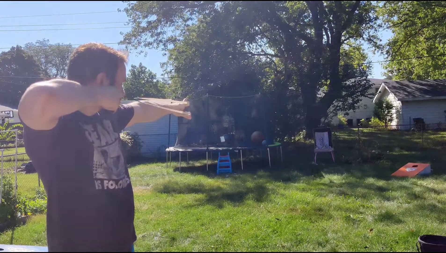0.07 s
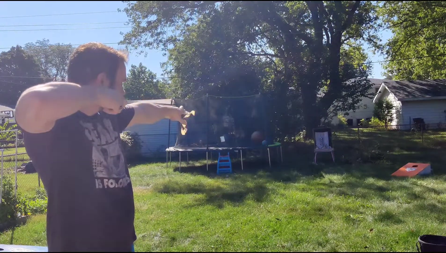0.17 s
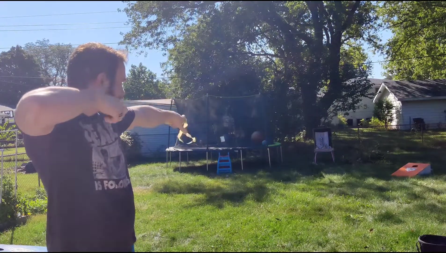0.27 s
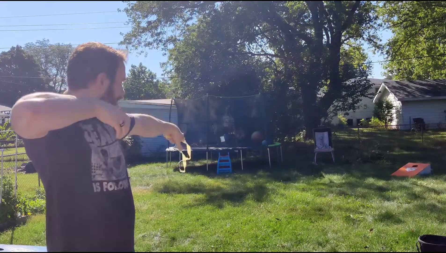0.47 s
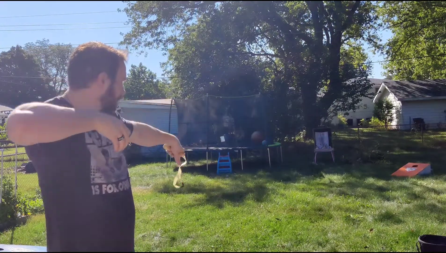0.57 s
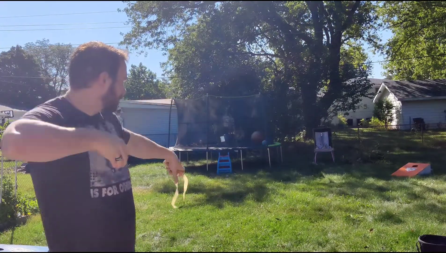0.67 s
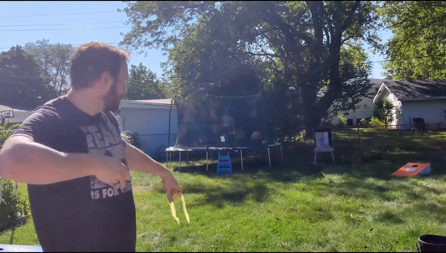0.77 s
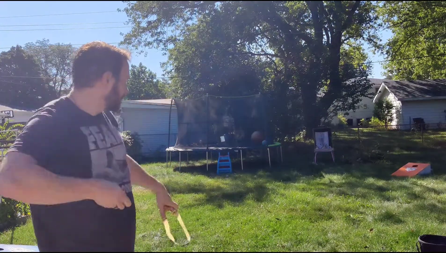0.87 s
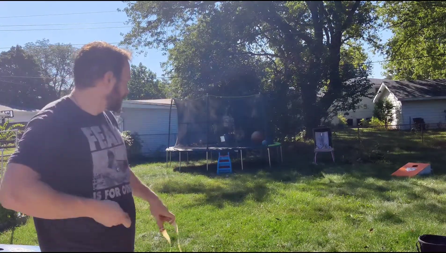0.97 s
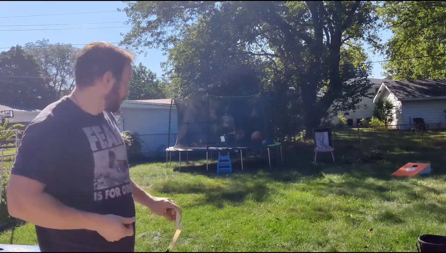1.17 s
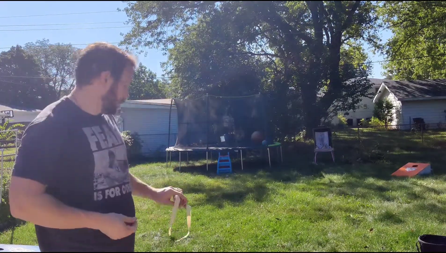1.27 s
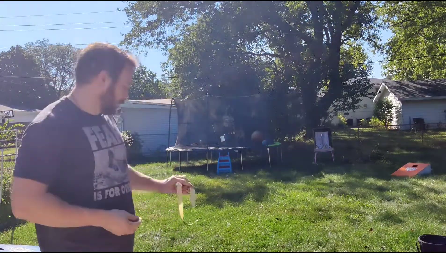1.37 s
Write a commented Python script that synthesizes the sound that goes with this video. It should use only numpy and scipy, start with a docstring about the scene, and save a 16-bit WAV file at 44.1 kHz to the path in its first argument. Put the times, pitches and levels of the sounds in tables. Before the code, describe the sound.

A slingshot band snaps twice in quick succession at about 0.2 seconds, close by, pushing soft puffs of air at the microphone. Just before 0.5 seconds the ball hits a thin metal can with a loud, briefly ringing smack and a low boom. Echoes scatter around the yard and fade by about 1 second, leaving a faint cricket, one faint falling bird note and distant rumble.

```python
"""A faint cricket chirps over distant rumble and hiss. At 0.2 s a slingshot band snaps twice close to a
two-port microphone and pushes puffs of air at it. At 0.46 s the steel ball smacks a thin metal can across
the yard: the can rings and something slack behind it booms. Walls throw the smack back, fences and trees
scatter it. From 1 s, as the tail fades, the cricket returns and a bird adds one falling note."""
import sys
import numpy as np
from scipy import signal
from scipy.fft import rfft, irfft, next_fast_len
from scipy.io import wavfile
from scipy.ndimage import uniform_filter1d

SR = 44100
rng = np.random.default_rng(int(sys.argv[2]) if len(sys.argv) > 2 else 0)


def inscribe(sig):
    """Save sig as 16-bit PCM at rate SR to the path in sys.argv[1].

    A 1-D sig is mono; a 2-D sig holds one channel per row.
    Samples are clipped to [-1, 1] before scaling.
    """
    pcm = np.round(np.clip(np.atleast_2d(sig).T, -1, 1) * 32767)
    wavfile.write(sys.argv[1], SR, pcm.astype(np.int16))


N = 61739
SIDE = np.array([[.5], [-.5]])  # splits a left-right balance in dB between the channels


def can():
    """The ball smacks the can: a crack and a metal ring, then wall echoes and the yard's scatter."""
    # the smack, then its wall echoes: t/s, level/dB, dull above f/Hz, decay stretch/ratio
    hits = [(.4594, -5.5, 8330, 1.24), (.478, -22, 2975, 2), (.501, -10.5, 1100, 0.55),
            (.5307, -26.5, 1064, 1.2), (.5761, -23.5, 1480, 1.5), (.638, -13, 790, 4.26),
            (.667, -24.5, 1300, 2.26), (.699, -27.5, 1390, 4.5), (.722, -31, 2700, 1.73),
            (.7951, -45, 1410, 4.4), (.9129, -42, 1040, 1.8), (.9335, -40.5, 950, 2.7),
            (.955, -39, 1050, 1.6)]
    smack, echoes, t = np.zeros(N), np.zeros(N), np.arange(SR // 10) / SR
    impact_s, *impact = hits[0]
    add(smack, impact_s, can_ring(*impact, rise_s=.0003))
    crack_band = signal.butter(4, [900, 7000], "bandpass", fs=SR, output="sos")
    crack = signal.sosfilt(crack_band, rng.standard_normal(len(t)))
    add(smack, impact_s, crack * decay(t, db=-24, t60=0.051))
    for start, db, dull_hz, stretch in hits[1:]:
        add(echoes, start, can_ring(db, dull_hz, stretch, rise_s=1.5 / dull_hz))
    heard = smack + echoes + amp(-4.5) * yard(smack)
    low_cut = signal.butter(4, 634, "highpass", fs=SR, output="sos")  # a small can radiates little bass
    thud = amp(-13) * smack
    heard = signal.sosfilt(low_cut, heard) + thud
    return mic_ports(heard, arrive_ms=(.113, 0), bounce_ms=(1.16, 1.0), bounce_gain=(0.72, 0.46))


def can_ring(level_db, dull_hz, stretch, rise_s):
    """The thin metal's modes ring out after a short attack; far returns lose their top end."""
    # modes of the can: f/Hz, level/dB, t60/s before the stretch
    can_modes = [(714.2, -2, 0.04), (800.6, -5, 0.041), (864.4, -13.5, 0.046), (950, -11, 0.026),
                 (1018, -15, 0.055), (1251.3, -2.5, 0.032), (1309, -6.5, 0.032), (1516, -9.5, 0.028),
                 (2055, -20, 0.058), (2139, -12, 0.033), (2284, -10, 0.017), (2882, -32, 0.0242),
                 (3050, -20.5, 0.06), (3233, -6, 0.021), (3395, -8.5, 0.0081), (3530, -41, .02),
                 (4766, -16, 0.021), (4965, -14.5, 0.019), (5440, -15.5, 0.035), (5527, -13.5, 0.03),
                 (5660, -16.5, 0.029), (6400, -22.5, 0.017), (6295, -11.5, 0.0092)]
    t = np.arange(SR // 2) / SR
    hz, db, t60 = np.transpose(can_modes)[:, :, None]
    partials = decay(t, db, t60 * stretch) * np.sin(2 * np.pi * hz * t)
    dulled = partials / (1 + (hz / dull_hz) ** 6)
    return amp(level_db) * dulled.sum(0) * (1 - np.exp(-t / rise_s))


def boom():
    """Something slack behind the can swells and dies in low modes, then echoes."""
    # slack modes: f/Hz, level/dB, t60/s
    slack_modes = [(52, -19.5, 0.29), (78.6, -27, 0.41), (138.7, -20, 0.157)]
    # the boom and its echoes: t/s, level/dB
    arrivals = [(0.464, 3.5), (.548, -14.5), (0.602, -14), (0.644, -13.5), (.69, -12)]
    out, t = np.zeros(N), np.arange(SR // 2) / SR
    swell = np.minimum(t / 0.036, 1)
    body = -ring(t, slack_modes) * swell
    for start, db in arrivals:
        add(out, start, amp(db) * body)
    return out * amp(2 * SIDE)  # slightly left


def rubber_band():
    """Grainy bursts as the rubber whips forward, slaps and flaps back, knocking on fork and hand."""
    # bursts, two strong and two faint: t/s, attack/s, t60/s, level/dB, tilt/dB per octave, knock/dB
    snaps = [(0.205, 0.0088, 0.39, -42.5, -1.6, -71.5), (0.2236, 0.0017, 0.087, -23.5, -0.67, -22.5),
             (.249, 0.0022, 0.056, -23, -0.55, -31), (.261, 0.0015, 0.11, -38, -1.3, -49.5)]
    # tone of the rubber before the tilt: f/Hz, relative level/dB
    rubber_eq = [(88, -44), (150, -36), (265, -11.5), (467, -24), (875, -23), (1370, -27), (1670, -20),
                 (1950, -23.5), (4720, -23), (6210, -14), (9560, -37.5), (15300, -42), (16200, -58.5)]
    # stereo image of the bursts: f/Hz, left-right likeness
    image = [(150, 0.99), (900, 1), (1500, 0.35), (3000, 0.9), (4500, 0.67), (15000, 0.5)]
    # modes of fork and hand: f/Hz, level/dB, t60/s
    fork_modes = [(268.5, 5, 0.039), (832, -1.5, .06), (4860, -7, 0.044), (5840, -14, 0.032)]
    out, t = np.zeros((2, N)), np.arange(SR // 5) / SR
    knock = ring(t, fork_modes)
    for start, rise, t60, db, tilt_db, knock_db in snaps:
        grain = amp(flutter(len(t), smooth_samples=40))  # 1 dB rms
        tone = lambda hz: amp(curve(rubber_eq, hz) + tilt_db * np.log2((hz + 50) / 1000)) * (hz > 120)
        noise = unit_rms(filtered(stereo_noise(len(t), image) * grain, tone))
        burst = noise * decay(np.maximum(t - rise, 0), db, t60) + amp(knock_db) * knock
        add(out, start, burst * np.minimum(t / rise, 1) ** 2)
    heard = out + amp(-20.5) * yard(out.mean(0))
    return mic_ports(heard, arrive_ms=(0, .068), bounce_ms=(1.41, .98), bounce_gain=(0.3, 0.12))


def puffs():
    """Each push of air on the microphone is a pressure bump with a slower rebound."""
    # pushes of air: t/s, level/dB, width/s, left-right balance/dB
    pushes = [(0.252, -31.5, 0.0038, 13), (.28, -29, 0.0041, 14), (0.297, -30, 0.0044, 22)]
    t, out = np.arange(N) / SR, 0
    rebound_depth, rebound_s = 0.24, 0.011
    for centre, db, width, pan_db in pushes:
        bump = np.exp(-((t - centre) / width) ** 2)
        late = np.maximum(t - centre - width, 0) / rebound_s
        rebound = rebound_depth * np.e * late * np.exp(-late)
        out = out + amp(db + pan_db * SIDE) * (bump - rebound)
    return out


def yard(x):
    """Fences and trees scatter a sound into a patchy tail, each band dying at its own speed."""
    # decay of the tail: f/Hz, t60/s
    tail_t60 = [(300, 1), (700, 0.9), (1500, 0.7), (3000, 1), (6000, 0.81), (11000, 0.59)]
    # colour of the tail: f/Hz, relative level/dB
    tail_eq = [(500, -27), (750, 0), (1000, 4.5), (1250, 1.5), (1600, -8), (2050, 4.5), (2400, 2.5),
               (2750, 6), (3250, -9), (4200, 5), (5500, -0.7), (7000, 7), (10000, -1.5), (14000, 0.5)]
    wide_noise = stereo_noise(SR, image=[(1, 0.27)])  # same likeness at all frequencies
    hz, t, cells = signal.stft(wide_noise, SR, nperseg=256)
    patches = uniform_filter1d(rng.standard_normal(cells.shape[1:]), size=5, axis=0)
    patches_db = 3.5 * unit_rms(uniform_filter1d(patches, size=6, axis=1))
    field_db = curve(tail_eq, hz)[:, None] - 60 * t / curve(tail_t60, hz)[:, None] + patches_db
    tail = signal.istft(cells * amp(field_db), SR, nperseg=256)[1]
    predelay = round(.012 * SR)
    tail = np.pad(tail / np.linalg.norm(tail[0]), ((0, 0), (predelay, 0)))
    return signal.fftconvolve(x[None], tail, axes=1)[:, :N]


def cricket():
    """Soft, slightly rough pulses on one high pitch."""
    # cricket pulses: t/s, level/dB, length/s
    pulses = [(0.015, -60, 0.0083), (.04, -79, 0.0087), (0.06, -62, 0.008), (0.092, -68.5, 0.03),
              (0.15, -70, .014), (1.0, -65, .014), (1.042, -57.5, 0.0069), (1.064, -71, 0.0051),
              (1.082, -61.5, 0.024), (1.112, -64.5, .012)]
    t = np.arange(N) / SR
    rough = 1 + 0.19 * flutter(N, smooth_samples=90)
    envelope = sum(amp(db) * np.exp(-((t - centre) * 2 / length) ** 2) for centre, db, length in pulses)
    return envelope * rough * np.sin(2 * np.pi * 4570 * t)


def bird(start_s=1.062, length_s=.048, from_hz=4900, to_hz=4050):
    """One faint whistle that swells as its pitch falls."""
    progress = np.clip((np.arange(N) / SR - start_s) / length_s, 0, 1)
    hz = from_hz + (to_hz - from_hz) * progress
    return amp(-63) * np.sin(np.pi * progress ** 2) * np.sin(2 * np.pi * np.cumsum(hz) / SR)


def ambience():
    """A steady bed of distant rumble and hiss."""
    # tone of the bed: f/Hz, relative level/dB
    bed_eq = [(15, -2.5), (30, -0.5), (55, -6.), (100, -7), (150, -16.5), (250, -21.5), (420, -26.),
              (900, -27), (1300, -36), (2500, -40.5), (3800, -41.5), (5000, -38.5), (7000, -45.5),
              (8500, -54), (10000, -67), (16200, -75.5)]
    # lean of the bed: f/Hz, left-right balance/dB
    balance = [(60, 3.5), (240, -0.5), (950, 1), (3770, -1.5), (15000, 1.5)]
    # stereo image of the bed: f/Hz, left-right likeness
    image = [(30, 0.66), (90, 0.94), (200, 0.93), (350, 0.85), (550, 0.23), (1000, -0.28), (1400, -.3),
             (3000, -0.19), (15000, .05)]
    tone = lambda hz: amp(curve(bed_eq, hz) + SIDE * curve(balance, hz)) * (hz > 15)
    return amp(-46) * unit_rms(filtered(stereo_noise(N, image), tone))


def mic_ports(x, arrive_ms, bounce_ms, bounce_gain):
    """Each port (left, right) hears the sound at its own moment, and again off a nearby surface."""
    # the microphone body shades the ports: f/Hz, left-right balance/dB
    shade = [(450, 1), (730, 4), (1050, 0.5), (2500, -0.5), (3500, 1.), (5500, -6), (8000, 4.)]
    delay = lambda hz, ms: np.exp(-2j * np.pi * hz * np.array(ms)[:, None] / 1000)
    direct = lambda hz: amp(SIDE * curve(shade, hz)) * delay(hz, arrive_ms)
    comb = lambda hz: 1 + np.array(bounce_gain)[:, None] * delay(hz, bounce_ms)
    return filtered(x, lambda hz: direct(hz) * comb(hz))


def amp(db):
    return 10 ** (np.asarray(db) / 20)


def decay(t, db, t60):
    return amp(db - 60 * t / t60)


def ring(t, modes):
    return sum(decay(t, db, t60) * np.sin(2 * np.pi * hz * t) for hz, db, t60 in modes)


def unit_rms(x):
    return x / np.sqrt(np.mean(x ** 2) + 1e-20)


def flutter(size, smooth_samples):
    return unit_rms(uniform_filter1d(rng.standard_normal(size), size=smooth_samples))


def curve(points, hz):
    """Joins breakpoints along a log frequency axis."""
    f, value = np.transpose(points)
    return np.interp(np.log(hz + 1), np.log(f + 1), value)


def add(mix, start_s, sound):
    part = mix[..., round(start_s * SR):][..., :sound.shape[-1]]
    part += sound[..., :part.shape[-1]]


def filtered(x, gain):
    """Filters by a complex gain given as a function of frequency."""
    size = next_fast_len(2 * x.shape[-1])
    spectrum = rfft(x, size) * gain(np.fft.rfftfreq(size, 1 / SR))
    return irfft(spectrum, size)[..., :x.shape[-1]]


def stereo_noise(size, image):
    """Left and right noise, as alike at each frequency as the image curve says."""
    left, other = rng.standard_normal((size, 2)).T
    likeness = lambda hz: np.clip(curve(image, hz), -1, 1)
    right = filtered(left, likeness) + filtered(other, lambda hz: np.sqrt(1 - likeness(hz) ** 2))
    return np.array([left, right])


def scene():
    return can() + boom() + rubber_band() + puffs() + ambience() + cricket() + bird()


def record(dry):
    """The loudest peaks round off softly, then the very top is cut."""
    ceiling, cutoff_hz = 1.1, 16300
    soft = ceiling * np.tanh(dry / ceiling)
    high_cut = signal.firwin(511, cutoff_hz, window=("kaiser", 9), fs=SR)
    return signal.oaconvolve(soft, high_cut[None], "same")


dry = scene()
out = record(dry)
inscribe(out)
```